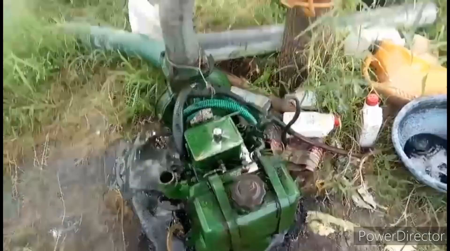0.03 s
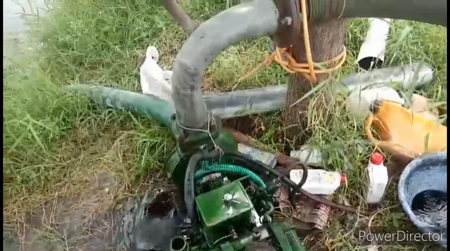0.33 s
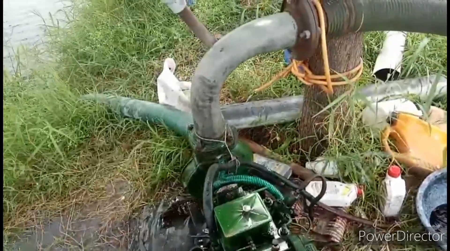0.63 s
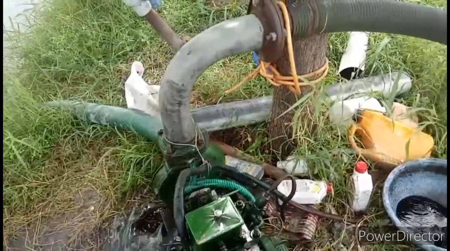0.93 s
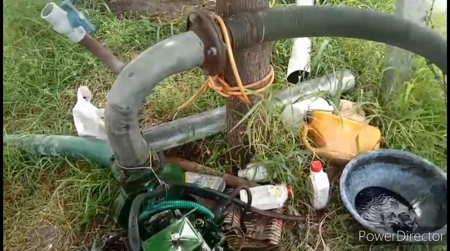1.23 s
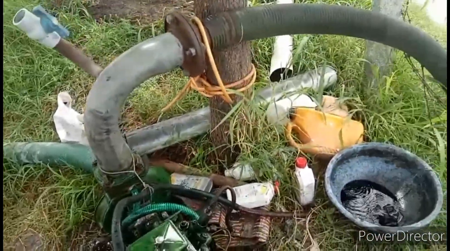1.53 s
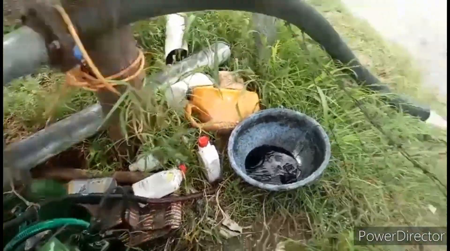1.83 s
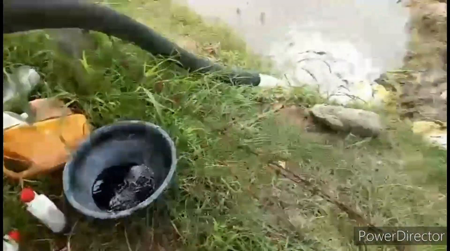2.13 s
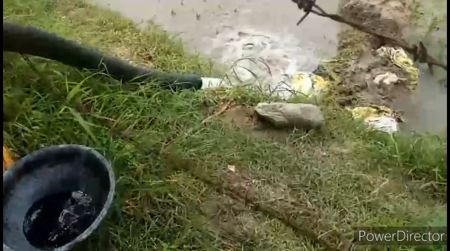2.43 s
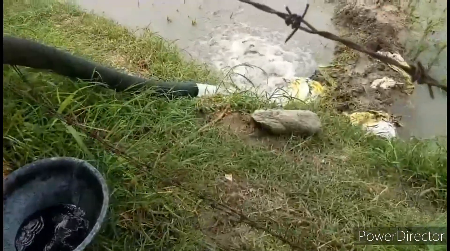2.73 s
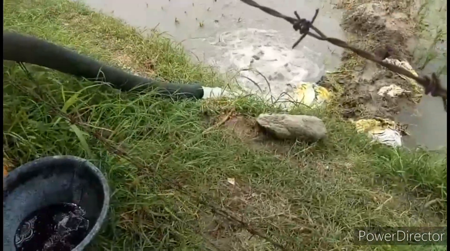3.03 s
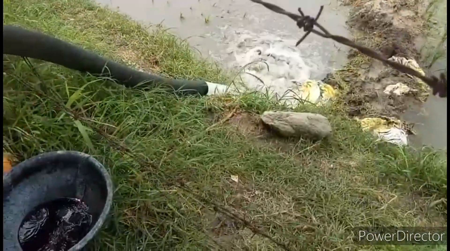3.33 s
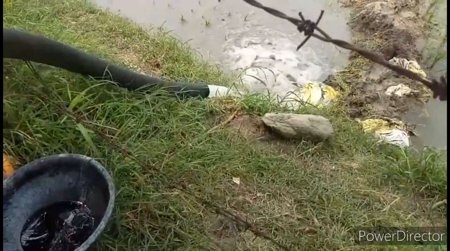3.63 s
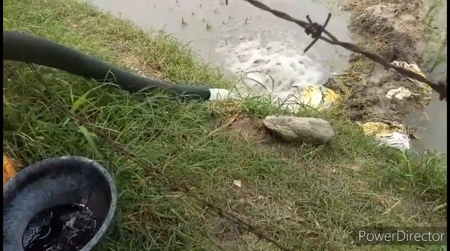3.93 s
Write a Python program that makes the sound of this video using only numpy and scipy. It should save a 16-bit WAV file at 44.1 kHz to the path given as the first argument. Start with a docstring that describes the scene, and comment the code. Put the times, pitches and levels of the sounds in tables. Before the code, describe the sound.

A small single-cylinder diesel engine chugs rapidly and steadily over faint rushing water.

```python
"""Over rushing water a single-cylinder four-stroke diesel chugs, about ten firings a second, driving a
pump beside a field. In each cycle the intake pipe rings as its valve shuts, combustion knocks the block,
the exhaust cracks open and hisses, the valve gear rings its cover, and the pipe hoots and pops as the
valves overlap. Halfway through, the microphone turns from the engine towards the outflow."""
import sys
import numpy as np
from scipy.fft import rfft, irfft, next_fast_len
from scipy.io import wavfile
from scipy.ndimage import map_coordinates

SR = 44100
rng = np.random.default_rng(int(sys.argv[2]) if len(sys.argv) > 2 else 0)


def int16_out(signal):
    """Quantize to a 16-bit WAV file."""
    q = np.round(np.clip(np.atleast_2d(signal).T, -1, 1) * 32767)
    wavfile.write(sys.argv[1], SR, q.astype(np.int16))


N = 176400
CYCLE_S = 0.098


def amp(db):
    """Amplitude ratio of a level in decibels."""
    return 10 ** (np.asarray(db) / 20)


def filtered(x, response):
    """Linear filtering: the spectrum of x times a frequency response."""
    size = next_fast_len(N + 8192)
    return irfft(rfft(x, size) * response(np.fft.rfftfreq(size, 1 / SR)), size)[:N]


def noise(spectrum):
    """White noise filtered to a spectrum of (frequency_hz, level_db) rows, at unit rms."""
    points_hz, db = np.transpose(spectrum)
    colour = lambda hz: amp(np.interp(np.log(hz + 1), np.log(points_hz), db))
    x = filtered(rng.standard_normal(N), colour)
    return x / x.std()


def level(db, turn_db):
    """Directivity: a gain that shifts by turn_db as the microphone turns away."""
    # microphone's turn: time_s, turn_fraction (0 over the engine, 1 facing the field)
    turn = [(0, 0), (1.5, 0), (2.0, 0.12), (2.5, 1), (4, 1)]
    return amp(db + turn_db * np.interp(np.arange(N) / SR, *np.transpose(turn)))


def each_cycle(moment_s, scatter_db, jitter_s):
    """Quasi-periodic excitation, moment_s after the exhaust opens: the latest event's age (s) and gain."""
    # firing times, with a brief 5 ms skip in the sound near 1.77 s: cycle_count, time_s
    firing_times = [(-1, -.0413), (10, 1.03), (14, 1.4203), (17, 1.7134), (17.45, 1.7574), (17.5, 1.7673),
                    (20, 2.012), (27, 2.6982), (30, 2.9916), (42, 4.168)]
    count, time_s = np.transpose(firing_times)
    cycles = np.arange(count[0], count[-1])
    chance = rng.standard_normal((len(cycles), 2))
    starts = np.interp(cycles + moment_s / CYCLE_S, count, time_s) + jitter_s * chance[:, 0]
    t = np.arange(N) / SR
    last = np.searchsorted(starts, t) - 1
    age = np.where(last < 0, t - starts[0] + CYCLE_S, t - starts[last])
    return np.abs(age), amp(scatter_db * chance[last, 1])


def envelope(age, attack, hold, t60):
    """Linear rise, hold and exponential decay, all in seconds."""
    return np.clip(age / attack, 0, 1) * amp(-60 * np.maximum(age - attack - hold, 0) / t60)


def ring(age, hz, t60):
    """Damped oscillation of one mode, building up within its first period."""
    return np.sin(2 * np.pi * hz * age) * amp(-60 * age / t60) * (1 - np.exp(-2 * hz * age))


def water():
    """Broadband flow noise: the outflow rushes steadily under the engine."""
    # outflow spectrum: frequency_hz, level_db
    rush_spectrum = [(20, -10), (60, -10), (120, 1), (400, 1), (1000, 5), (2500, -0.5), (5000, -8),
                     (9000, -14), (15000, -35)]
    return noise(rush_spectrum) * level(-34, turn_db=1)


def intake():
    """Air-column resonance: the intake valve shuts and the air in its pipe rings on."""
    # intake pipe modes: frequency_hz, level_db, t60_s
    pipe_modes = [(362.5, 0, 0.39), (925, -9, 0.16)]
    age, gain = each_cycle(0.052, scatter_db=0.77, jitter_s=0.00006)
    pipe = sum(amp(db) * ring(age, hz, t60) for hz, db, t60 in pipe_modes)
    return pipe * gain * envelope(age, attack=0.0014, hold=0.029, t60=0.066) * level(-13.5, turn_db=-5)


def knock():
    """Impact excitation: combustion strikes the block's modes in a few quick blows, with a rattle."""
    # blows of one knock: start_s, level_db, tilt_db_per_octave
    blows = [(0.075, -7.5, 4), (0.0765, 1, 0), (0.0794, -1, 0.5), (0.0805, -10, 4), (0.085, -8.5, -6)]
    # engine block modes: frequency_hz, level_db, t60_s, turn_db
    block_modes = [(1020, 1.5, 0.031, -4.5), (1136, 1.5, 0.018, 2), (1560, -9.5, 0.027, 13.5),
                   (1676, -6, 0.02, 14.5), (2380, -11, 0.028, 10), (2740, -3, 0.02, 0),
                   (3040, -4, 0.036, 0.5), (4270, -2, 0.012, -11)]
    # rattle spectrum: frequency_hz, level_db
    rattle_spectrum = [(200, 2), (700, -2), (1050, -10), (1300, -3), (1600, 8), (2000, -10.5), (3000, -3.5),
                       (3700, -9.5), (5000, -7), (8000, -29), (9500, -14.5), (13000, -36)]
    block = np.zeros(N)
    for start_s, blow_db, tilt_db in blows:
        age, gain = each_cycle(start_s, scatter_db=1.6, jitter_s=0.00017)
        for hz, db, t60, turn_db in block_modes:
            mode_db = blow_db + db + tilt_db * np.log2(hz / 1600)
            block += gain * level(mode_db, turn_db) * ring(age, hz, t60)
    age, gain = each_cycle(0.071, scatter_db=2.5, jitter_s=0.00018)
    rattle = noise(rattle_spectrum) * gain * envelope(age, attack=0.0029, hold=0.0073, t60=0.043)
    return amp(-21.5) * block + rattle * level(-23.5, turn_db=1.5)


def exhaust():
    """Sudden pressure release: a steep front, a turbulent blast, a low puff and a long dying hiss."""
    # spectra of the escaping gas: frequency_hz, level_db
    blast_spectrum = [(60, -8), (200, -10), (320, 1), (600, -2), (1300, -0.5), (2000, -1), (3300, -3),
                      (4000, 0.5), (4800, 0.5), (5800, -4.5), (7900, -11), (9200, -7), (11500, -17),
                      (13500, -27), (15000, -9), (16000, -29)]
    hiss_spectrum = [(60, -19), (300, -8), (700, -9.5), (1300, -8.5), (2200, -5), (3400, -4.5),
                     (4300, -3.5), (5000, 1.5), (5600, -2), (6600, -3), (7900, -11.5), (9500, -5),
                     (11500, -13.5), (13500, -20.5), (15000, -10), (16000, -12)]
    puff_spectrum = [(20, -33), (50, -28), (85, 4), (160, 3), (300, -2), (600, -15.5), (2000, -60)]
    lead_s = 0.002  # the pulse begins ahead of its centre
    age, gain = each_cycle(-lead_s, scatter_db=0.7, jitter_s=0)
    widths = (age - lead_s) / 0.0003
    front = -widths * np.exp(-widths ** 2 / 2) * gain * level(-2, turn_db=-0.5)
    age, gain = each_cycle(0, scatter_db=0.72, jitter_s=0)
    blast = noise(blast_spectrum) * envelope(age, attack=0.0019, hold=0.0058, t60=0.016)
    hiss = noise(hiss_spectrum) * envelope(age, attack=0.0032, hold=0.019, t60=0.15)
    jet = gain * shell(blast * level(-6.5, turn_db=-1) + hiss * amp(-16))
    age, gain = each_cycle(0.0012, scatter_db=0.7, jitter_s=0)
    puff = noise(puff_spectrum) * gain * envelope(age, attack=0.0095, hold=0.002, t60=0.038)
    return front + jet + puff * level(-16.5, turn_db=-4.5)


def shell(x, ripple_db=1.5, width_hz=130):
    """Shell resonance: the thin metal around the gas puts narrow peaks and dips in the treble."""
    knots = rng.standard_normal(1000)
    ripple = lambda hz: map_coordinates(knots, [hz / width_hz], mode="reflect")
    return filtered(x, lambda hz: amp(ripple_db * ripple(hz) * np.clip(hz / 2500, 0, 1)))


def tappet():
    """Narrow-band resonance: the valve gear rings its cover, a little differently every time."""
    # valve cover modes: frequency_hz, level_db, t60_s
    cover_modes = [(4000, -3, 0.047), (4540, -2.5, 0.046), (4706, -13, 0.043), (5007, 1, 0.044),
                   (5230, -15.5, 0.059)]
    cover = np.zeros(N)
    for hz, db, t60 in cover_modes:
        age, gain = each_cycle(0.0185, scatter_db=4.5, jitter_s=0.00067)
        band = noise([(hz * 0.9, -50), (hz * 0.975, -5), (hz, 0), (hz * 1.025, -5), (hz * 1.1, -50)])
        cover += amp(db) * gain * band * envelope(age, attack=0.00073, hold=0.0078, t60=t60)
    return cover * level(-26, turn_db=6)


def hoot():
    """Pipe resonance with both valves open: a tone swells and rings out, sinking as the pipe cools."""
    start_hz, end_hz, sink_s = 891, 832, 0.012
    age, gain = each_cycle(0.0212, scatter_db=1.16, jitter_s=0.0001)
    swell = envelope(age, attack=0.00059, hold=0.0044, t60=0.0092) * level(-15, turn_db=0.5)
    growth = amp(3.7 * np.minimum(age / 0.0062, 1))
    ring_out = envelope(age, attack=0.0068, hold=0.0015, t60=0.058) * level(-18.5, turn_db=1.5)
    periods = end_hz * age + (start_hz - end_hz) * sink_s * np.tanh(age / sink_s)
    return np.sin(2 * np.pi * periods) * (swell * growth + ring_out) * gain


def pop():
    """A rarefaction pulse, quick to form and slower to fade, pops as the hoot's swell ends."""
    centre_s, lead_s = 0.0268, 0.004
    age, gain = each_cycle(centre_s - lead_s, scatter_db=0.65, jitter_s=0.0001)
    offset_s = age - lead_s
    width_s = np.where(offset_s < 0, 0.0007, 0.0025)
    pulse = np.exp(-(offset_s / width_s) ** 2 / 2)
    body = np.cos(2 * np.pi * 325 * offset_s) * level(-7, turn_db=-6)
    edge = np.cos(2 * np.pi * 480 * offset_s) * level(-18, turn_db=4)
    return -gain * pulse * (body + edge)


def scene():
    """Superposition of the water and the engine's sources in one channel."""
    return (water() + intake() + knock() + exhaust() + tappet() + hoot() + pop())[None]


def record(dry):
    """Band limiting and soft saturation: the microphone sheds deep bass and top treble and rounds peaks."""
    low_cut_hz, top_hz = 45, 15650
    ceiling, hardness = 0.97, 5
    x = filtered(dry[0], lambda hz: hz ** 2 / np.sqrt(hz ** 4 + low_cut_hz ** 4))
    x = x / (1 + np.abs(x / ceiling) ** hardness) ** (1 / hardness)
    return filtered(x, lambda hz: hz < top_hz)[None]


dry = scene()
out = record(dry)
int16_out(out)
```